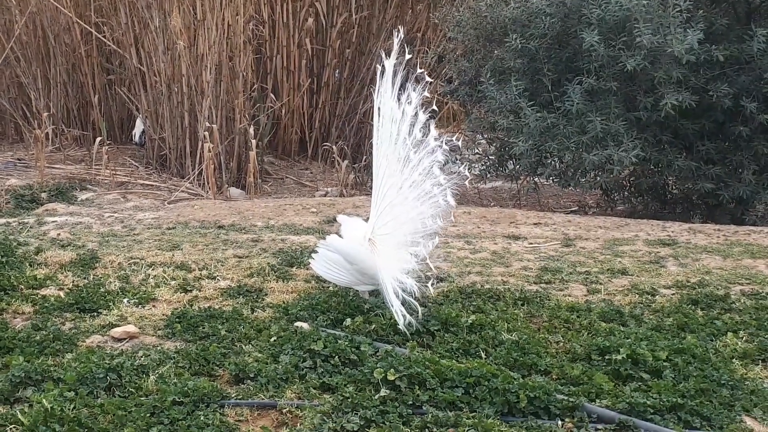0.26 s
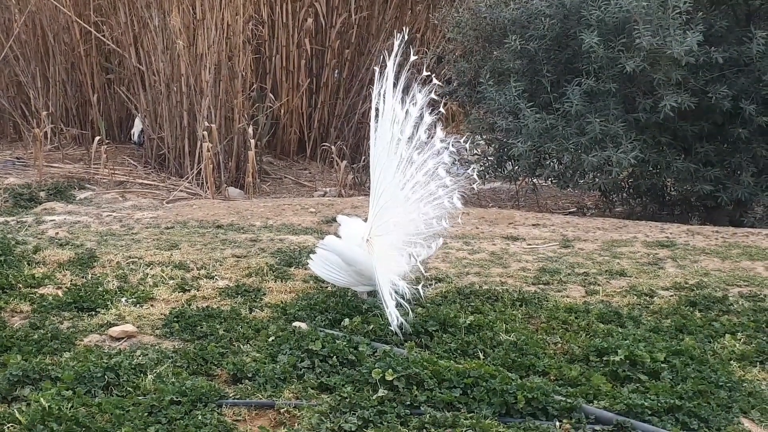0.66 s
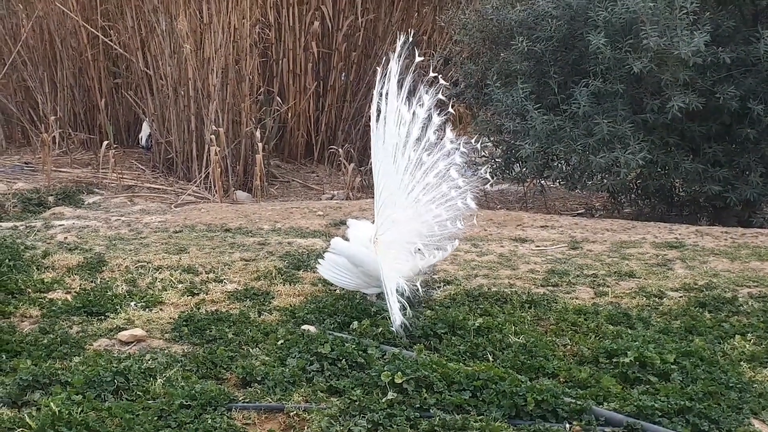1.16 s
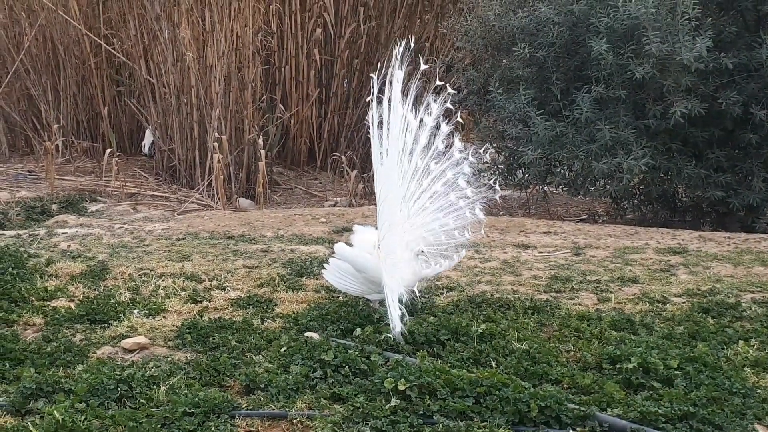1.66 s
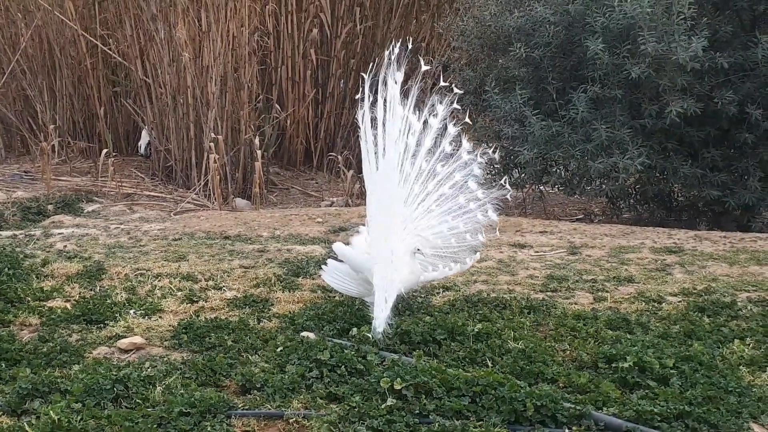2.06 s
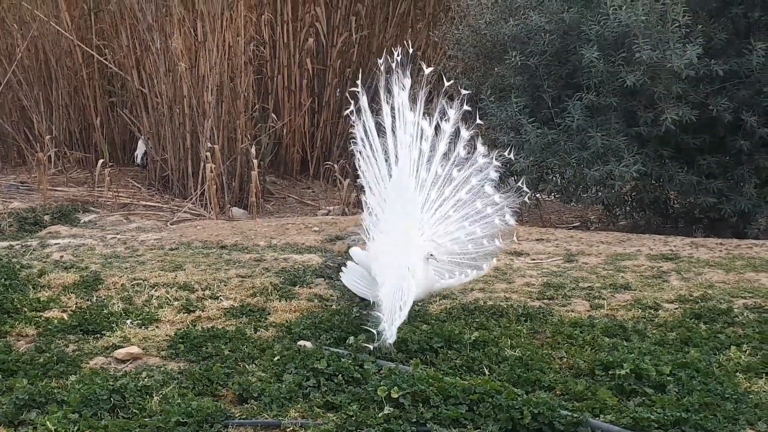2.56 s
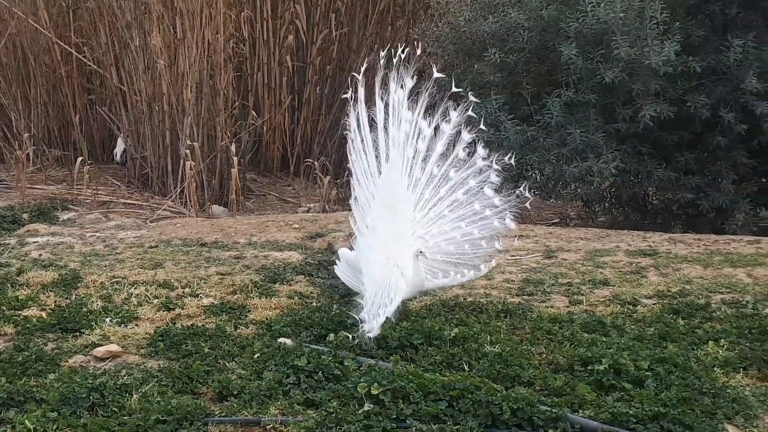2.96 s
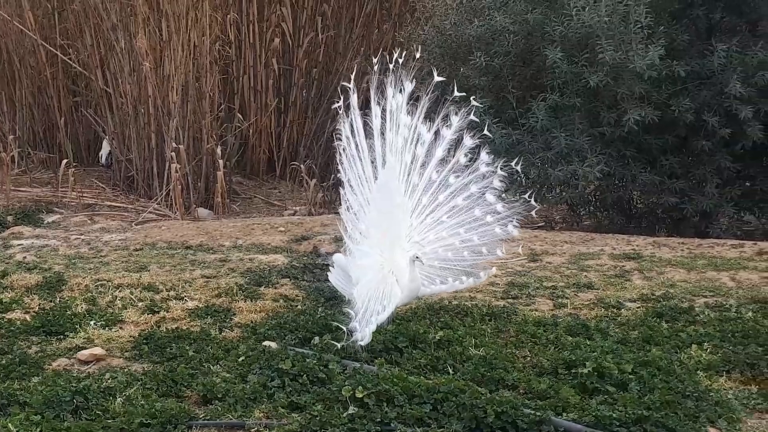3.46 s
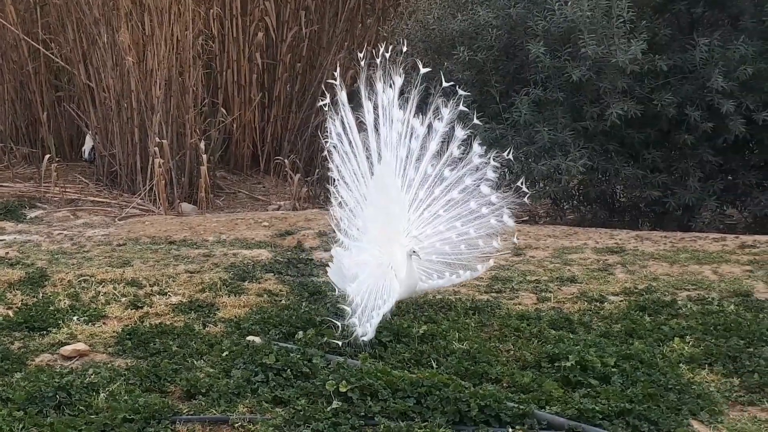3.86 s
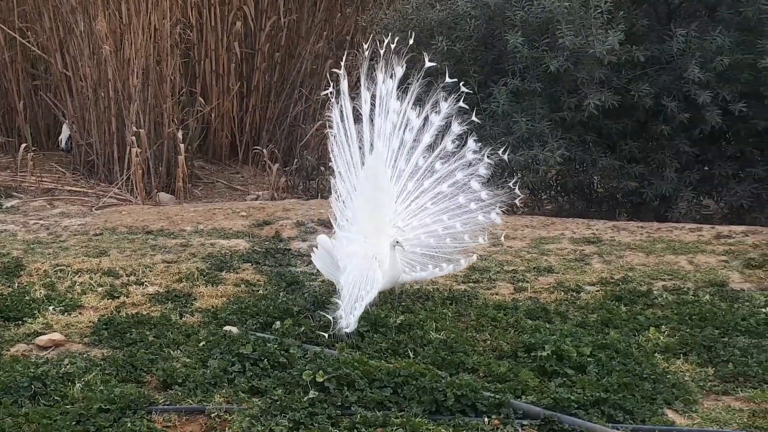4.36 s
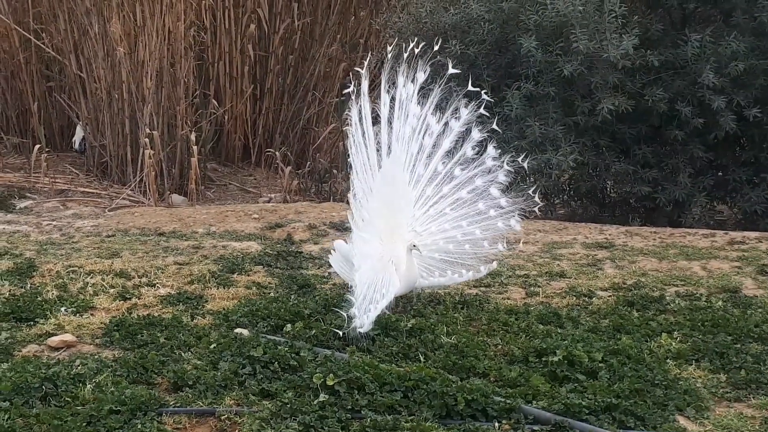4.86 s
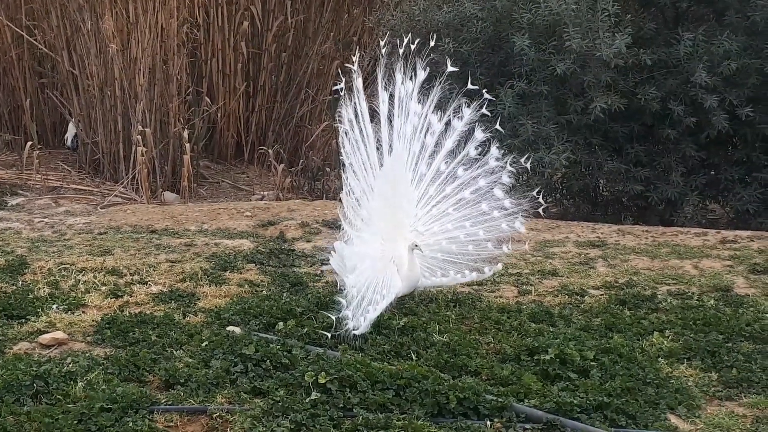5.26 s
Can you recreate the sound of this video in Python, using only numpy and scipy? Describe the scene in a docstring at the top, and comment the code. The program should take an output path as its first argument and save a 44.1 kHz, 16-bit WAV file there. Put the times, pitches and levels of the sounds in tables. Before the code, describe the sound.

Loud drawn-out peacock calls ring out over steady small-bird chirping and faint distant traffic, then fingers tap briefly near the microphone.

```python
"""Distant traffic rumbles under microphone hiss as a far peacock calls across a grassy slope. Small birds
whistle and sparrows chirp in the reeds throughout. Half a second in, a long-winded peacock, out of sight,
begins five hoarse wails, its throat ringing and its windpipe rasping; a higher one cuts in with four, and
a soft, low thump passes beneath them. A faint, distant echo of the long wail lingers as the last wail
falls away. From about three seconds, fingers tap the phone and briefly ring its case."""
import sys
import numpy as np
from scipy import signal
from scipy.fft import rfft, irfft
from scipy.io import wavfile
from scipy.ndimage import uniform_filter1d

SR = 44100
rng = np.random.default_rng(int(sys.argv[2]) if len(sys.argv) > 2 else 0)


def generate_wav(sig):
    """Save sig (samples, or channels by samples) to the path in sys.argv[1] as 16-bit PCM at SR."""
    pcm = np.round(np.clip(np.atleast_2d(sig).T, -1, 1) * 32767).astype(np.int16)
    wavfile.write(sys.argv[1], SR, pcm)


N = 243873

# Colour of the background bed. Each row: frequency in Hz, relative spectrum level in dB.
BED_SPECTRUM = [(12, -28.5), (20, -20), (53, 2), (91, 0), (234, -13.5), (445, -14), (659, -13), (975, -20),
                (1850, -21.5), (2380, -19.5), (3530, -26), (3840, -22), (5670, -29), (14700, -31),
                (16000, -26.5)]
# How centred the bed sits. Each row: frequency in Hz, left-right likeness from 0 to 1.
BED_LIKENESS = [(25, 0.74), (60, 1), (130, 0.85), (290, 0.84), (640, 0.71), (1400, 0.23), (3100, .55),
                (5500, 0.17), (7000, 0.99)]
BED_RMS_DB = -60.5

# Peacock wails, one curve each. Each row of a curve: time in seconds, pitch in Hz,
# fundamental level in dB, overtone level in dB, roughness from 0 to 1.
# The distant pair is the opening far call, then a faint echo of the long wail.
FAR_CALL_AND_ECHO = [
    [(0.0, 636, -77, -67, 0.16), (.2, 632, -70, -65, 0.18), (.4, 618, -62, -72.5, 0.34),
     (.5, 612, -60, -72, 0.21), (.55, 620, -56, -44, 0.29)],
    [(2.24, 644, -38, -73, 0.11), (2.32, 642, -57.5, -61, 0.23), (2.52, 624, -51, -59, 0.15),
     (2.62, 663, -70.5, -61, 0.81), (2.7, 678, -58.5, -80, 0.31), (2.78, 668, -62.5, -92, 0.24),
     (2.88, 647, -63.5, -86, 0.25), (3.06, 620, -75, -102, 0.35)],
]
LONG_WAILS = [
    [(.52, 561, -64, -51, 0.5), (.56, 638, -35.5, -44.5, 0.42), (.6, 715, -36.5, -40.5, 0.51),
     (.68, 640, -36, -39.5, 0.47), (.74, 645, -43.5, -52.5, 0), (.79, 618, -53, -49, 0.4),
     (.83, 664, -36.5, -57, 0.5), (.87, 707, -45, -45, 0.1), (.9, 703, -52, -72, .5)],
    [(.94, 688, -50.5, -52.5, 0.5), (1.0, 702, -31, -57, 0), (1.05, 700, -25, -41, .28),
     (1.11, 697, -26, -54.5, 0.14), (1.17, 698, -26.5, -54, 0.3), (1.23, 717, -50.5, -41, 1.1)],
    [(1.22, 717, -59, -41, 0.7), (1.31, 646, -36.5, -43, 0.32), (1.37, 605, -47, -45, 0.4),
     (1.43, 571, -55, -37.5, 0.3), (1.48, 589, -47, -42.5, .17)],
    [(1.47, 589, -46, -41, .17), (1.51, 667, -35.5, -52.5, 0.27), (1.56, 697, -30, -44.5, 0.22),
     (1.62, 712, -40.5, -41, 0.43), (1.69, 695, -34, -46.5, 0.38), (1.77, 678, -39.5, -40.5, 0.21),
     (1.88, 680, -35.5, -39, 0.12), (1.96, 667, -46.5, -42.5, 0.1), (2.12, 643, -39.5, -39, 0.23),
     (2.19, 633, -38.5, -39.5, 0.2), (2.25, 618, -32.5, -42.5, 0.06)],
    [(2.235, 581, -41.5, -44.5, 0.18), (2.31, 571, -46.5, -54, 0.22), (2.38, 554, -57.5, -45.5, 0.04),
     (2.52, 532, -52, -43, 0.16), (2.56, 530, -68, -45.5, 0.14), (2.59, 504, -52.5, -45.5, 0.42),
     (2.63, 490, -78, -58, 0.54)],
]
HIGH_WAILS = [
    [(.56, 708, -70, -62, 0.33), (.6, 739.5, -42, -37, 0.37), (.65, 761.7, -41, -38, 0.33),
     (.7, 763, -57.5, -47.5, 0.14), (.73, 730, -66, -41, .45)],
    [(.81, 659, -45.5, -42, 0.54), (.83, 749.4, -30.5, -49.5, .6), (.86, 813, -42.5, -31.5, 0.41),
     (.91, 777.3, -28.5, -39, .35), (.96, 764, -32, -35.5, 0.69), (1.02, 755, -37, -34.5, 0.7),
     (1.08, 739, -48.5, -54, 0.97), (1.13, 711.5, -35, -48, 0.61), (1.18, 705, -59.5, -40, 0.61)],
    [(1.17, 717.3, -43, -33, .52), (1.22, 800, -37, -38.5, 0.57), (1.27, 797, -30.5, -36, 0.64),
     (1.33, 763, -61, -53, 0.34), (1.4, 731, -39, -49, 1)],
    [(1.53, 719.7, -26.5, -51, 0.86), (1.58, 729, -44.5, -37.5, 0.55), (1.64, 768.5, -38.5, -36.5, .3),
     (1.7, 765, -43.5, -32.5, 0.31), (1.76, 746.5, -46.5, -37, 0.68), (1.84, 752.6, -73, -54, 0.38),
     (1.92, 746, -48.5, -55, 0.7), (2.0, 772, -68, -52, 0.67)],
]
# Timbre, one row a curve. Each row: partial 2, partial 3, half-pitch lines and brightness,
# all as offsets in dB on the overtone level.
DISTANT_TIMBRE = [(-5, -18, 0, 0), (-4, -29, -1.5, -18)]
LONG_TIMBRE = [(-3, -2.5, -15, -8), (-13, -0.5, -5, -20.5), (-4, -5, -17, -17), (-4.5, -5.5, -13.5, -11.5),
               (-12.5, 0, -41, -13.5)]
HIGH_TIMBRE = [(-0.91, -20, -17.5, -8), (-0.15, -33, -22, -20.5), (-1.3, -25, -12.5, -9),
               (-0.87, -37, -48, -23.5)]
# Lines from alternating strong and weak cycles. Each row: multiple of the pitch, gain in dB.
HALF_PITCH_LINES = [(.5, -19.5), (1.5, -10.5), (2.5, 3.5), (3.5, -12)]
# Throat resonances that colour partials 4 and up. Each row: centre in Hz, width in Hz, gain in dB.
THROAT_RESONANCES = [(2150, 400, 6), (3100, 700, -17), (3950, 400, -8), (5050, 700, -5), (6650, 350, -14)]
# Breath in the windpipe. Each row: centre in Hz, width in Hz, gain in dB.
BREATH_BANDS = [(727, 565, -15), (1407, 514, -5.5), (2122, 310, -11.5), (2987, 530, -23),
                (4220, 600, -26.5), (5670, 690, -41.5), (7100, 1200, -40)]
HOARSE_DULL_DB, WAIL_FADE_S = -32, .016  # brightness change at full roughness; fade at each end
# The calls at the two microphone ports. Each row: frequency in Hz, phase lead of the left in radians.
PORT_LEAD = [(300, 0.1), (600, 1.0), (860, 1.1), (1120, 3.2), (1550, 4.8), (2000, 6.1), (3000, 6.8),
             (4000, 5.7), (6000, 6.3)]

# Whistles of small birds. Each row: start in seconds, length in seconds, first, middle and last
# pitch in Hz, level in dB, pan as left minus right in dB.
WHISTLE_NOTES = [(.01, 0.12, 2812, 2345, 2060, -69, -12), (0.062, 0.085, 2450, 3090, 2800, -65, -8),
                 (0.159, 0.045, 3090, 2740, 2500, -65, -8), (0.979, 0.067, 3820, 3640, 3230, -51, -4),
                 (2.922, 0.079, 5540, 4780, 4740, -78, 21), (3.256, 0.079, 3770, 3420, 3280, -55, -3),
                 (3.5, 0.15, 3310, 2890, 2400, -53.5, -5), (3.64, 0.08, 2620, 2180, 2120, -58, -3),
                 (4.571, 0.038, 2300, 2180, 2080, -62.5, -9), (4.687, 0.039, 2274, 2244, 2180, -54, -6),
                 (5.315, 0.12, 8660, 6260, 5760, -75, 8), (5.443, 0.062, 7400, 7500, 9100, -76, 9)]
# Far, blurred bird notes and one soft, low thump at 1.24 seconds. Each row reads like a whistle's.
FAR_NOTES_AND_THUMP = [(.08, 0.18, 1200, 1187, 1257, -75, -5), (.33, 0.057, 1280, 1303, 1380, -71.5, -11),
                       (1.24, 0.074, 247, 230, 200, -65, -5), (3.02, 0.21, 2380, 2512, 2340, -77.5, -9),
                       (3.17, 0.26, 2336, 2140, 2085, -72, -10),
                       (3.33, 0.053, 3260, 3270, 3120, -71.5, -12), (4.06, 0.35, 589, 663, 670, -82, -7),
                       (4.2, 0.04, 400, 382, 373, -76, -10), (4.37, 0.052, 2170, 2380, 2200, -72.5, -6),
                       (4.63, 0.1, 1746, 1760, 1810, -76.5, -13), (4.78, 0.08, 1376, 1370, 1370, -78, -14),
                       (4.94, 0.14, 2350, 2400, 2130, -79.5, -10), (5.27, 0.25, 741, 747, 800, -84.5, -19)]

# Near sparrows. Each row: start in seconds, length in seconds, bottom and top pitch in Hz,
# level in dB, pan as left minus right in dB.
SPARROW_CHIRPS = [(0.209, 0.096, 2900, 4360, -65, -16), (0.606, 0.088, 3190, 4920, -53, -8),
                  (0.76, 0.064, 2990, 4320, -57, -1), (1.676, 0.043, 3500, 4790, -66, -15),
                  (1.936, 0.098, 3590, 4890, -57.5, -3), (2.077, 0.056, 3170, 4600, -57.5, -1),
                  (2.251, 0.097, 3100, 5400, -51, 0), (2.515, 0.052, 3980, 4750, -58, -10),
                  (2.558, 0.074, 3000, 4430, -54, -3), (3.041, 0.06, 3510, 5090, -62, -6),
                  (3.376, 0.095, 2931, 5240, -56, -2), (3.664, 0.07, 3690, 5190, -56, 2),
                  (3.719, 0.07, 2840, 4500, -53, 1), (3.94, 0.079, 2760, 4190, -70.5, -14),
                  (4.046, 0.063, 3590, 5160, -63.5, -13), (4.093, 0.035, 2880, 3590, -63.5, -10),
                  (4.22, 0.028, 2970, 3900, -70, -2), (4.359, 0.13, 3160, 5660, -63, -6),
                  (4.431, 0.087, 3740, 5140, -54, 2), (4.924, 0.097, 3510, 3960, -64, -11),
                  (4.969, 0.064, 3187, 5220, -51.5, 1), (5.178, 0.053, 3040, 4090, -69, -15),
                  (5.462, 0.055, 3500, 5340, -63, 2)]
ARCHES_PER_S, ARCH_START = 26, .0995  # a chirp starts this share of the way through an arch

# Fingers on the phone. Each row: start in seconds, peak in dB, pan as left minus right in dB.
FINGER_TAPS = [(3.123, -47, -4.5), (3.136, -30.5, -3.5), (3.144, -34, -6), (3.835, -50, 3),
               (3.846, -35.5, -4.5), (3.854, -43.5, -9), (3.909, -49, -7), (4.285, -61, -1.0)]
# Modes of the case. Each row: frequency in Hz, relative level in dB, seconds to die away by 60 dB.
CASE_MODES = [(358, -33, 0.03), (877, 11.5, 0.01), (1240, 9.5, 0.0044), (2380, 4, 0.0067),
              (3500, 12.5, 0.0019), (5930, -7, 0.012)]
TOUCH_S = .00017  # soft skin takes this long to push

HISS_HZ, HISS_OPENS_DB, HISS_DB_PER_DB = 7400, -61.5, .15  # treble lift: corner, threshold, slope


def undb(db):
    """Decibels to amplitude."""
    return 10 ** (np.asarray(db) / 20)


def across(table, hz):
    """Read a (Hz, value) table on a log-frequency axis."""
    f, v = np.transpose(table)
    return np.interp(np.log(np.maximum(hz, 1)), np.log(np.maximum(f, 1)), v)


def drift(rate, size):
    """Smooth random motion that turns about rate times a second; spread near 1."""
    hold = max(int(SR / rate), 2)
    steps = np.repeat(rng.standard_normal(size // hold + 1), hold)
    return 1.264 * uniform_filter1d(uniform_filter1d(steps, hold), hold)[:size]


def band(x, hz, width_hz):
    """A steep resonance."""
    b, a = signal.iirpeak(hz, hz / width_hz, SR)
    return signal.lfilter(b, a, signal.lfilter(b, a, x))


def place(out, x, start, pan_db):
    """Place a mono sound in the stereo field."""
    i = int(start * SR)
    x = x[:N - i]
    out[:, i:i + len(x)] += x * undb(np.array([[pan_db], [-pan_db]]) / 2)


def background_bed():
    """Traffic rumble, far-off twitter and hiss: half-octave noise bands drift, the middle ones most."""
    hz = np.fft.rfftfreq(N, 1 / SR)
    swell = drift(1, N)
    likeness = np.clip(across(BED_LIKENESS, hz), 0, 1)
    colour = undb(across(BED_SPECTRUM, hz))
    mid, side = (rfft(rng.standard_normal(N)) * colour * np.sqrt(1 + k * likeness) for k in (1, -1))
    stereo = np.array([mid + side, mid - side])
    out = np.zeros((2, N))
    for step in range(21):
        share = np.clip(1 - np.abs(2 * np.log2(np.maximum(hz, 1) / 20) - step), 0, 1)
        depth = across([(200, .7), (500, .8), (5000, .6), (7000, .2)], 20 * 2 ** (step / 2))
        out += undb(depth * (.25 * swell + 3.9 * drift(7.5, N))) * irfft(share * stereo, N)
    return out * undb(BED_RMS_DB) / np.sqrt(np.mean(out ** 2))


def throat(hz):
    """Gain in dB of the throat resonances."""
    power = sum(undb(2 * db) / (1 + (2 * (hz - f) / width) ** 4) for f, width, db in THROAT_RESONANCES)
    return 10 * np.log10(power)


def hoarse_partial(k, phase, rough):
    """One line of a hoarse voice: the higher, the more it flutters, slips in phase and fades in patches."""
    size = len(phase)
    smear = np.minimum(1.5 * rough ** 1.4 * k ** .9, 1.7)
    flutter = 1 + .83 * smear * drift(60.28, size)
    patches = undb(.2 * k * drift(12, size))
    slip = 1.6 * smear * drift(40 + 25 * k, size)
    return flutter * patches * np.sin(k * phase + slip + rng.uniform(0, 2 * np.pi))


def peacock(wails, timbres, shake, rasp_db, haze=0.):
    """Partials and half-pitch lines ride a wavering pitch; roughness smears and dulls the voice."""
    out = np.zeros(N)
    for wail, (two_db, three_db, half_db, bright_db) in zip(wails, timbres):
        times, *curves = np.transpose(wail)
        i = np.arange(int(times[0] * SR), int(times[-1] * SR))
        hz, one_db, over_db, rough = (np.interp(i / SR, times, curve) for curve in curves)
        rough = np.clip(rough + haze, 0, 1)  # a long path through moving air roughens the lines
        phase = 2 * np.pi * np.cumsum(hz * (1 + shake * rough * drift(89.7, len(i)))) / SR
        lines = [(1, one_db), (2, over_db + two_db), (3, over_db + three_db)]
        lines += [(k, over_db + half_db + db) for k, db in HALF_PITCH_LINES]
        upper_db = over_db + bright_db + HOARSE_DULL_DB * rough
        lines += [(k, upper_db + throat(k * hz)) for k in range(4, 14)]
        voice = sum(undb(db) * hoarse_partial(k, phase, rough) for k, db in lines)
        # air rasps through the windpipe in step with the effort
        effort = np.sqrt(undb(2 * one_db) + undb(2 * over_db))
        breath = sum(undb(db) * band(rng.standard_normal(len(i)), f, width) * np.sqrt(SR / width)
                     for f, width, db in BREATH_BANDS)
        fade = np.clip(np.minimum(i - i[0], i[-1] - i) / (WAIL_FADE_S * SR), 0, 1)
        out[i] += fade * (np.sqrt(2) * voice + undb(rasp_db) * rough * effort * breath)
    return out


def microphone_ports(calls):
    """The two ports hear the calls out of step, the left ahead in phase."""
    lead = across(PORT_LEAD, np.fft.rfftfreq(N, 1 / SR))
    return irfft(rfft(calls) * np.exp(.5j * lead * np.array([[1], [-1]])), N)


def bent_notes(table, waver, blur, blur_hz):
    """Near-sine notes that bend through three pitches; leaves and distance blur the far ones."""
    out = np.zeros((2, N))
    for start, length, *pitches, db, pan_db in table:
        progress = np.arange(int(length * SR)) / (length * SR)
        bend = np.polyval(np.polyfit([0, .5, 1], pitches, 2), progress)
        hz = bend * (1 + waver * drift(120, len(progress)))
        envelope = np.sin(np.pi * progress) ** .5 * (1 + blur * drift(blur_hz, len(progress)))
        tone = np.sqrt(2) * np.sin(2 * np.pi * np.cumsum(hz) / SR)
        place(out, undb(db) * envelope * tone, start, pan_db)
    return out


def echoes(x, t60_s, width):
    """A tail of scattered echoes; width sets how unlike left and right are."""
    t = np.arange(int(t60_s * SR)) / SR
    mid, side = rng.standard_normal((2, len(t))) * 1000 ** (-t / t60_s)
    response = np.array([mid + width * side, mid - width * side]) / np.sqrt(np.sum(mid ** 2))
    return signal.fftconvolve(x[None], response, axes=1)[:, :N]


def flock(count=30, length_s=.045, level_db=-70.5):
    """Faint chirps from the rest of the flock, scattered at random, as rows like the near sparrows'."""
    starts = rng.uniform(0, N / SR - .15, count) + .05
    pitch, loudness, pan = rng.standard_normal((3, count))
    rows = zip(starts, 3100 * (1 + .1 * pitch), level_db + 3.5 * loudness, 8 * pan)
    return [(start, length_s, low_hz, 1.35 * low_hz, db, pan_db) for start, low_hz, db, pan_db in rows]


def sparrows():
    """Each chirp rasps as its pitch arches up and down, the arches sinking toward the end."""
    out = np.zeros((2, N))
    for start, length, low_hz, top_hz, db, pan_db in SPARROW_CHIRPS + flock():
        size = int(length * SR)
        progress = np.arange(size) / (length * SR)
        arch = (.5 + .5 * np.cos(2 * np.pi * (ARCH_START + ARCHES_PER_S * length * progress))) ** 1.3
        arch *= np.minimum(1, 1.5 - 1.2 * progress)
        hz = (low_hz + (top_hz - low_hz) * arch) * (1 + .04 * drift(400, size))
        rasp = (1.16 + drift(600, size)) * undb(-4 * arch)
        tone = np.sin(np.pi * progress) ** .54 * rasp * np.sin(2 * np.pi * np.cumsum(hz) / SR)
        place(out, undb(db) * tone, start, pan_db)
        # scratchy air starts before the tone and outlasts it
        air_band = signal.butter(4, (.9 * low_hz, 1.05 * top_hz), "band", fs=SR, output="sos")
        air = signal.sosfilt(air_band, rng.standard_normal(2 * size)) * undb(3.5 * drift(90, 2 * size))
        place(out, undb(db) * np.hanning(2 * size) * air, start - length / 2, pan_db)
    return out


def finger_taps():
    """A fingertip knocks the case, whose modes die away at once, in a new balance each tap."""
    out = np.zeros((2, N))
    t = np.arange(int(.05 * SR)) / SR
    for start, peak_db, pan_db in FINGER_TAPS:
        ring = sum(undb(db + 4 * rng.standard_normal()) * np.sin(2 * np.pi * hz * t) * 1000 ** (-t / t60)
                   for hz, db, t60 in CASE_MODES)
        ring *= 1 - np.exp(-t / TOUCH_S)
        place(out, undb(peak_db) * ring / np.abs(ring).max(), start, pan_db)
    return out


def scene():
    """The near peacocks echo dully off the slope, the small birds briefly in the reeds; taps stay dry."""
    near = peacock(LONG_WAILS, LONG_TIMBRE, shake=.0078, rasp_db=.5)
    near += peacock(HIGH_WAILS, HIGH_TIMBRE, shake=.0079, rasp_db=-3.5)
    distant = peacock(FAR_CALL_AND_ECHO, DISTANT_TIMBRE, shake=.0071, rasp_db=4, haze=.31)
    dulled = signal.sosfilt(signal.butter(2, 3060, fs=SR, output="sos"), near)
    slope = undb(-6) * echoes(dulled, t60_s=.9, width=.99)
    calls = microphone_ports(near + distant + slope)
    chirps = sparrows()
    whistles = bent_notes(WHISTLE_NOTES, waver=.006, blur=.5, blur_hz=70)
    blurred = bent_notes(FAR_NOTES_AND_THUMP, waver=.055, blur=2.5, blur_hz=150)
    reeds = undb(-2) * echoes((chirps + .53 * whistles + blurred).mean(0), t60_s=.36, width=.85)
    return calls + chirps + whistles + blurred + reeds + finger_taps() + background_bed()


def record(dry):
    """A noise suppressor lets more treble hiss through while the mids are loud; the phone cuts the top."""
    hz = np.fft.rfftfreq(N, 1 / SR)
    treble = irfft(rfft(dry) / (1 + (HISS_HZ / np.maximum(hz, 1)) ** 8), N)
    mids = band(dry.mean(0), hz=3000, width_hz=4900)
    mids_db = 10 * np.log10(uniform_filter1d(mids ** 2, int(.061 * SR)) + 1e-12)
    lift_db = HISS_DB_PER_DB * np.maximum(mids_db - HISS_OPENS_DB, 0)
    top_cut = signal.ellip(10, .2, 80, 15800, fs=SR, output="sos")
    return signal.sosfilt(top_cut, dry + treble * (undb(lift_db) - 1))


dry = scene()
out = record(dry)
generate_wav(out)
```